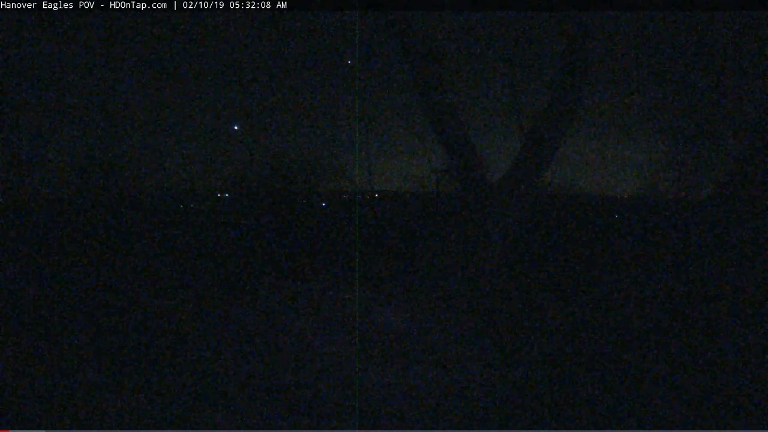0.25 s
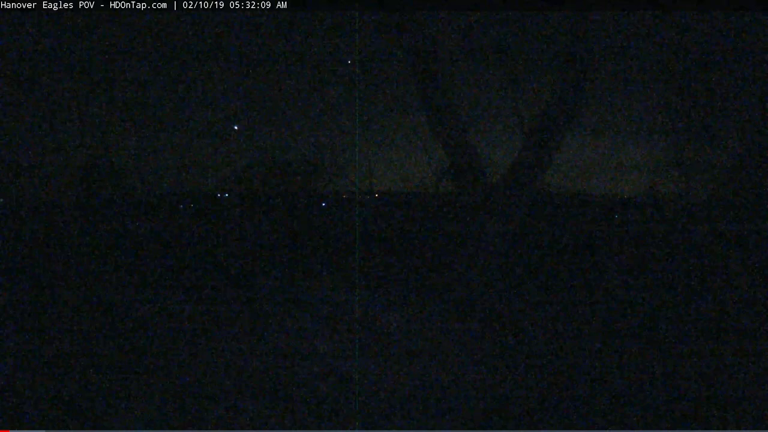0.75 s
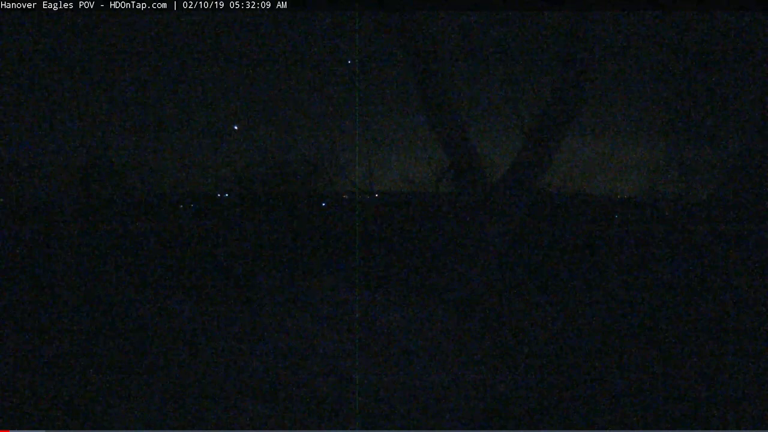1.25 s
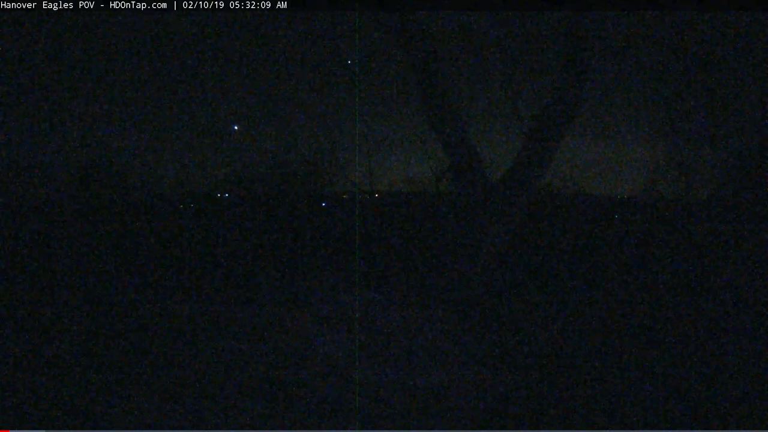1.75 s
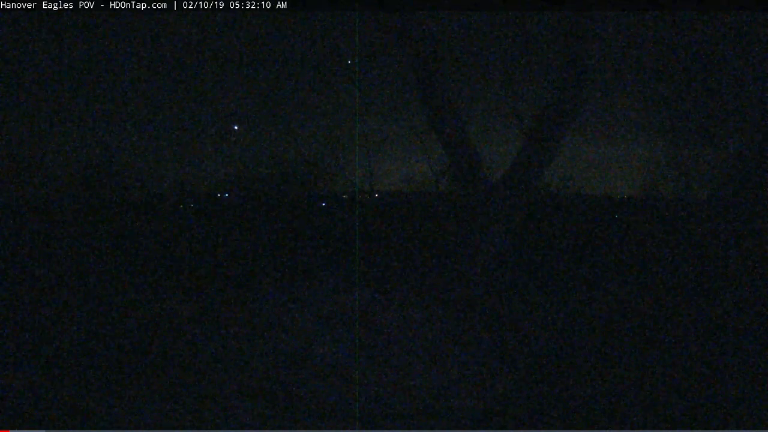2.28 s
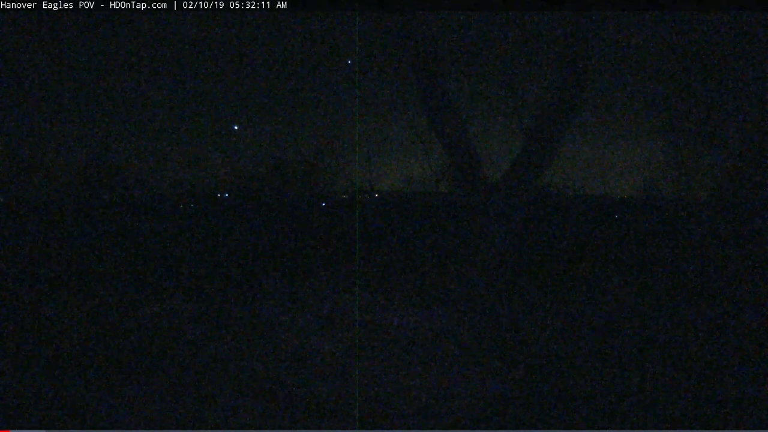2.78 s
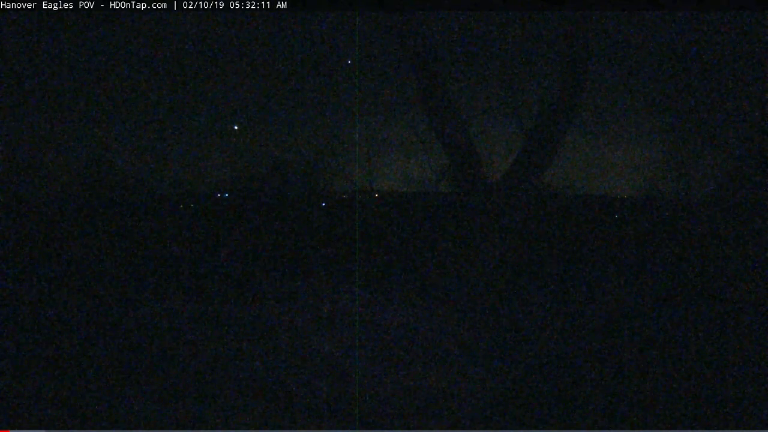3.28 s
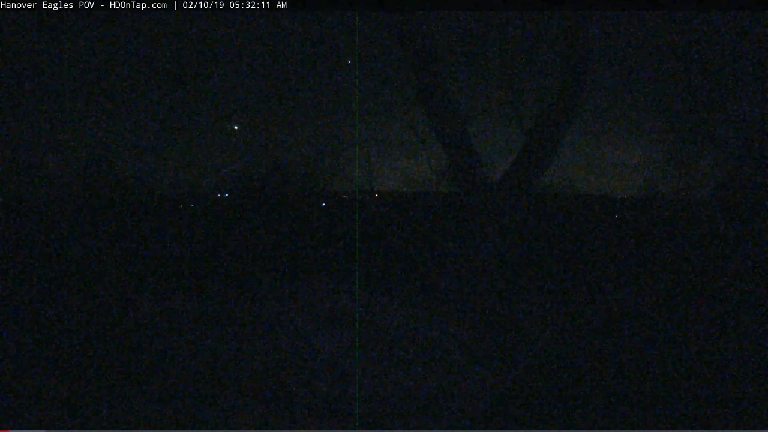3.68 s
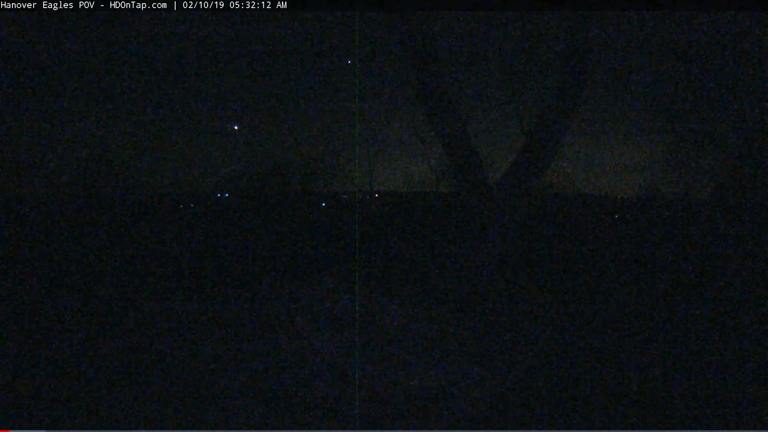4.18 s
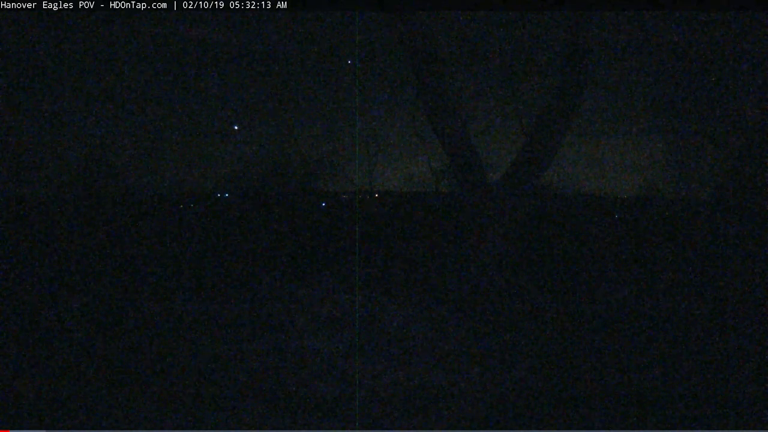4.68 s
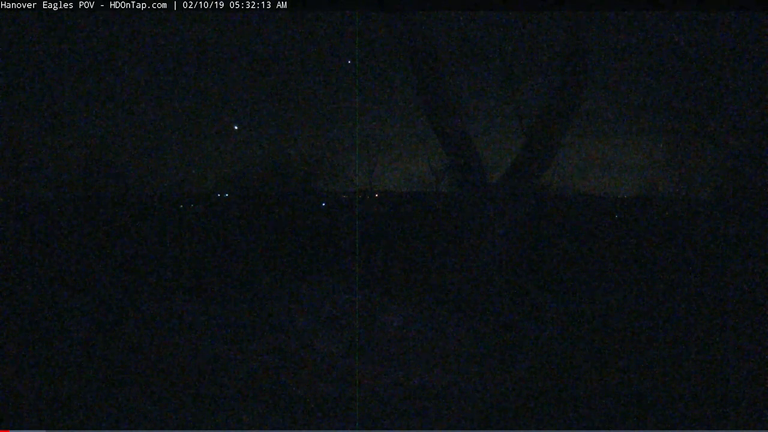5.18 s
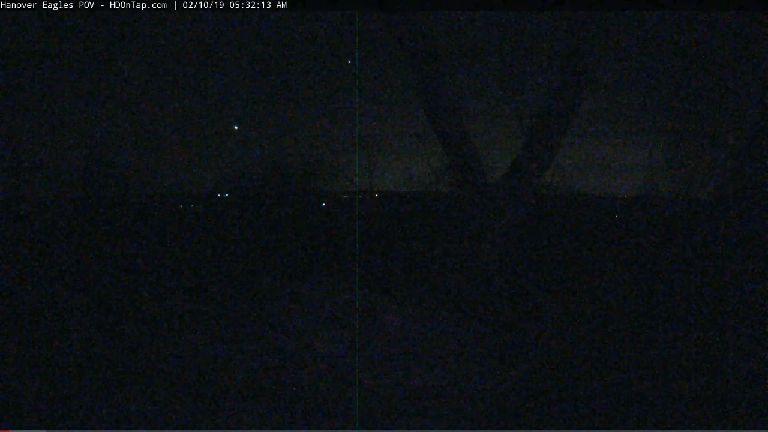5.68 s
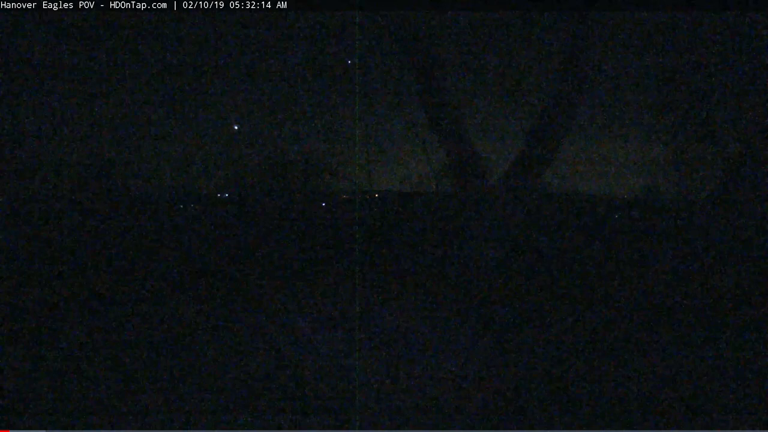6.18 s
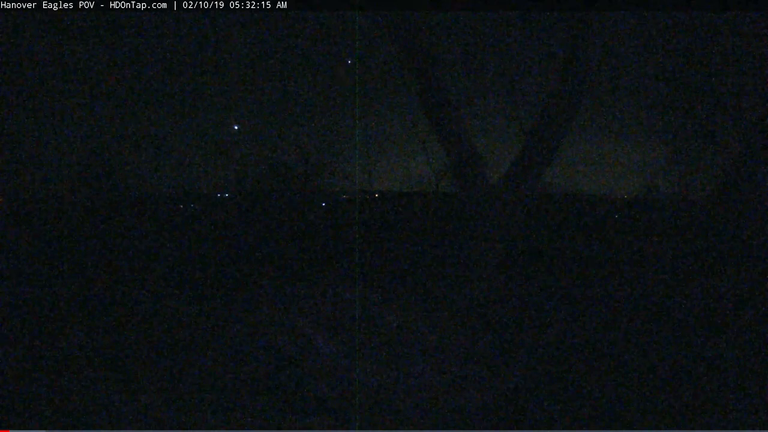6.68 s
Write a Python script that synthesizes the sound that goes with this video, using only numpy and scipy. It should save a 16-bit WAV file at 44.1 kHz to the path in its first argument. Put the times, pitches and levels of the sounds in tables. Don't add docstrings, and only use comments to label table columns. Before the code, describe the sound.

Fading squeals ring through night woods, then a raptor chatters in fast staccato, bursting into loud squealing notes over low hiss and rumble.

```python
import sys
import numpy as np
from scipy import signal
from scipy.fft import rfft, irfft, next_fast_len
from scipy.io import wavfile
from scipy.ndimage import uniform_filter1d

SR = 44100
rng = np.random.default_rng(int(sys.argv[2]) if len(sys.argv) > 2 else 0)


def transcribe(u):
    v = np.clip(np.atleast_2d(u).T, -1, 1)
    q = np.round(v * 32767).astype(np.int16)
    wavfile.write(sys.argv[1], SR, q)


def natural_amplitude(level_db):
    exponent = np.asarray(level_db, float) / 20
    return 10 ** exponent


N = 306054
LEAD = round(.6 * SR)

# [t/s, length/s, buzz f/Hz, beak f/Hz, peak level/dB]
CHATTER_NOTES = [(.318, 0.048, 895, 4020, -45), (.428, 0.03, 903, 5000, -46), (.456, .03, 904, 4380, -38),
                 (.547, 0.0278, 933, 4970, -37), (.578, 0.014, 898, 4750, -28),
                 (.682, 0.027, 894, 4300, -26.5), (.805, 0.028, 870.5, 4220, -27),
                 (.937, 0.021, 906, 3770, -32), (1.064, 0.019, 839, 3790, -40.5),
                 (2.870, 0.016, 664, 3650, -45.5), (2.992, 0.019, 673, 3570, -38.5),
                 (3.115, 0.019, 656, 3384, -31.5), (3.247, 0.022, 632.6, 3050, -15),
                 (3.378, 0.031, 643, 2963, -19.5), (4.663, 0.032, 866, 4130, -30.5),
                 (4.786, 0.044, 905, 4690, -36), (4.922, 0.032, 876, 4230, -27.5),
                 (5.061, 0.031, 855, 4100, -29), (5.198, 0.018, 846, 3930, -31.5)]
STEADY_DB, STEADY_SPAN_DB, STEADY_FLOOR = -18, 9, .3
GLIDE_SHARE, RASP_SHARE = 0.07, .42


def chatter(track):
    order = np.arange(3, 8)[:, None]
    flutter = signal.butter(6, 220, fs=SR, output="sos")
    treble = signal.butter(4, 6000, "high", fs=SR, output="sos")
    for s, length, buzz_hz, beak_hz, peak_db in CHATTER_NOTES:
        unrest = np.clip((STEADY_DB - peak_db) / STEADY_SPAN_DB, STEADY_FLOOR, 1)
        along, shape, quaver = note(length, attack_s=.005, release_s=.012)
        glide = GLIDE_SHARE * unrest * (np.sqrt(along) - .65)
        pitch_hz = buzz_hz * (1 + glide + .005 * quaver)
        phase = 2 * np.pi * np.cumsum(pitch_hz) / SR
        beak = 1 / (1 + ((order * buzz_hz - beak_hz) / 400) ** 2) ** 2.1
        wobble = rms_one(signal.sosfilt(flutter, rng.standard_normal((2, 5, 4000))))
        in_phase, quadrature = RASP_SHARE * unrest * wobble[..., -len(along):]
        partials = (1 + in_phase) * np.sin(order * phase) + quadrature * np.cos(order * phase)
        voice = rms_one((beak * partials).sum(axis=0)) / np.sqrt(2)
        octave = signal.sosfilt(treble, voice ** 2)
        add(track, s, natural_amplitude(peak_db) * shape * (voice + natural_amplitude(-30) * octave))


# [t/s, length/s, first f/Hz, held f/Hz, peak level/dB]
SQUEAL_NOTES = [(-.42, .044, 3500, 3140, -37.5), (-.33, .058, 2000, 2500, -25.5),
                (-.2, 0.045, 2600, 2375, -26), (-.16, 0.026, 2500, 2226, -29),
                (-.26, 0.0097, 2012, 1900, -18), (3.117, 0.094, 1890, 2575, -19),
                (3.519, 0.026, 2854, 2500, -18), (3.667, 0.021, 2290, 2372, -20.5),
                (3.685, 0.014, 2230, 1894, -33), (3.83, 0.0157, 2180, 1970, -19.5),
                (3.852, .016, 1560, 1245, -48.5), (4.03, 0.015, 1590, 1280, -47),
                (3.376, 0.011, 4350, 4080, -42.5), (3.396, 0.015, 2500, 2123, -27.5),
                (3.519, 0.011, 2320, 1998, -32), (0.938, .014, 2930, 2840, -51),
                (3.114, 0.013, 1660, 1968, -31.5), (5.321, 0.0286, 3540, 3320, -33.5)]
OVERTONE_LEVELS = (-25.5, -44.5)
SAG_SHARE, SAG_PER_S, SAG_GONE_HZ = 0.17, 1.3, 3500


def squeals(track):
    for s, length, first_hz, held_hz, peak_db in SQUEAL_NOTES:
        low_sag = SAG_SHARE * max(1 - held_hz / SAG_GONE_HZ, 0)
        last_hz = held_hz * (1 - low_sag - SAG_PER_S * length)
        along, shape, quaver = note(length, attack_s=0.14 * length, release_s=0.12 * length)
        slide_on = (first_hz - held_hz) * np.exp(-along / .09)
        slide_off = (last_hz - held_hz) * along ** 6
        pitch_hz = held_hz + slide_on + slide_off
        phase = 2 * np.pi * np.cumsum(pitch_hz * (1 + 0.0094 * quaver)) / SR
        effort = np.exp(-((pitch_hz / held_hz - 1) / .07) ** 2)
        overtones = sum(natural_amplitude(db) * np.sin((k + 2) * phase) for k, db in enumerate(OVERTONE_LEVELS))
        add(track, s, natural_amplitude(peak_db) * shape * (np.sin(phase) + effort * overtones))


# [t/s, length/s, rms level/dB, open-beak brightness/dB]
PUFF_NOTES = [(0.311, .049, -49.5, -8.5), (.421, 0.068, -50.5, 3), (0.542, 0.05, -49.5, 2.5),
              (0.674, 0.04, -47, -9), (0.93, 0.042, -49.5, -10), (1.064, .04, -55, -12),
              (3.245, 0.041, -47, 1), (3.37, .054, -48, -4.5), (3.488, 0.05, -49, -2.5),
              (4.648, .06, -53, -1), (4.765, 0.072, -53.5, 4), (4.91, 0.06, -52, 0),
              (5.057, 0.026, -47, -7), (5.172, 0.06, -56, -12)]
# [f/Hz, width/Hz, level/dB]
THROAT_MODES = [(2500, 1100, 17), (3654, 320, 20.5), (4500, 940, 17.5), (5300, 460, 11), (7690, 830, -5)]
GAPE_HZ = 5000


def puffs(track):
    for s, length, level_db, bright_db in PUFF_NOTES:
        along, shape, quaver = note(length, attack_s=.005, release_s=.025)
        air = rng.standard_normal(4000)
        out = 0
        for hz, width_hz, gain_db in THROAT_MODES:
            mode_db = gain_db + bright_db * (hz > GAPE_HZ)
            out = out + natural_amplitude(mode_db) * resonance(air, hz, width_hz)
        add(track, s, natural_amplitude(level_db) * shape * rms_one(out)[-len(shape):])


# [t/s, level/dB]
BEAK_CLACKS = [
    (.421, -52),
    (.545, -59),
    (3.247, -49),
    (3.395, -45),
    (3.520, -49),
    (4.700, -57),
    (.940, -63),
    (1.068, -65),
]


def clacks(track):
    bright = signal.butter(5, [2000, 8300], "band", fs=SR, output="sos")
    for s, level_db in BEAK_CLACKS:
        crack = rng.standard_normal(900) * np.exp(-np.arange(900) / SR / .004)
        add(track, s, natural_amplitude(level_db) * signal.sosfilt(bright, crack))


# [delay t/s, level/dB]
SLAPS = [(.006, -20), (.013, -5), (.049, -12), (0.058, -5.5), (0.071, -20.5), (0.088, -14), (.12, -22)]
# [f/Hz, t60/s]
TAIL_T60 = [(1000, 0.58), (2000, 1.66), (3200, 1.24), (4500, 0.91), (5600, 0.47), (8000, 0.2)]
# [f/Hz, level/dB]
RETURN_COLOUR = [(1200, -13), (2000, -3.5), (2600, 1), (3400, 3), (4500, 2.5), (5600, 0), (8000, 7)]


def wood(x, tail_db, build_s):
    t = np.arange(round(1.8 * SR)) / SR
    slaps = np.zeros(len(t))
    for delay_s, level_db in SLAPS:
        slaps[round(delay_s * SR)] += natural_amplitude(level_db)
    leaves = natural_amplitude(tail_db) * rng.standard_normal(len(t)) * (1 - np.exp(-(t / build_s) ** 2))
    answer = np.zeros(len(t))
    for hz, band in bands(slaps + leaves, 500, 2):
        answer += band * natural_amplitude(at_hz(RETURN_COLOUR, hz) - 60 * t / at_hz(TAIL_T60, hz))
    answer[0] += 1
    return signal.fftconvolve(x, answer)[LEAD:LEAD + N]


# [t/s, length/s, f/Hz, width/Hz, rms level/dB]
FAR_HOOTS = [
    (-.1, 0.65, 800, 94, -58.5),
    (0.391, 0.79, 674, 21, -64.5),
    (5.598, 0.45, 768, 10, -69.5),
    (1.249, 1.38, 2123, 6.2, -64),
    (2.547, 0.65, 2129, 8.8, -62.5),
    (4.297, 2.7, 2122, 4.4, -64),
    (4.399, 2.9, 1683, 105, -64),
]


def far_tones():
    track = np.zeros(N + LEAD)
    for s, length, hz, width_hz, level_db in FAR_HOOTS:
        t = np.arange(round(length * SR)) / SR
        tone = resonance(rng.standard_normal(3 * SR), hz, width_hz)[-len(t):]
        swell = np.clip(np.minimum(t / 0.017, (length - t) / 0.24), 0, 1)
        add(track, s, natural_amplitude(level_db) * tone * swell)
    return track[LEAD:]


# [t/s, peak level/dB]
AIR_HEAVES = [(.12, -52), (.53, -50), (.68, -60), (0.811, -51), (1.209, -52), (1.721, -49.5), (1.95, -58),
              (2.48, -58), (2.9, -54), (3.13, -54.5), (3.29, -53), (3.46, -56.5), (3.611, -55), (3.84, -61),
              (4.339, -57), (5.089, -56), (5.57, -57), (5.73, -57), (6.1, -58), (6.55, -59)]
# [t/s, peak level/dB]
AIR_GUSTS = [(.07, -52), (.44, -53), (.51, -52), (.69, -48), (.85, -49), (1.131, -53), (1.33, -55),
             (1.45, -53), (1.839, -51.5), (2.07, -53), (2.36, -55.5), (2.54, -48.5), (2.65, -53.5),
             (2.839, -53), (3.12, -47), (3.42, -57.5), (3.6, -52), (3.82, -50.5), (3.96, -53), (4.119, -52),
             (4.341, -53.5), (4.459, -56.5), (4.61, -51.5), (4.79, -55), (5.04, -46.5), (5.561, -55),
             (5.67, -51), (6.009, -53.5), (6.68, -52.5), (6.87, -60.5)]
CALM_DB, GUST_RISE_DB_PER_S, GUST_FALL_DB_PER_S = -68, 153.5, 149


def rumble():
    out = np.zeros(N)
    for low_hz, high_hz, rows in ((22.6, 50, AIR_HEAVES), (60.4, 145, AIR_GUSTS)):
        s, peak_db = np.transpose(rows)[..., None]
        late_s = np.arange(0, N + 100, 100) / SR - s
        drop_db = np.maximum(late_s * GUST_FALL_DB_PER_S, -late_s * GUST_RISE_DB_PER_S)
        gust_db = np.maximum((peak_db - drop_db).max(axis=0), CALM_DB)
        level_db = np.interp(np.arange(N) / 100, np.arange(len(gust_db)), gust_db)
        thud = signal.butter(3, [low_hz, high_hz], "band", fs=SR, output="sos")
        low = signal.sosfilt(thud, rng.standard_normal(N + SR))[SR:]
        out += natural_amplitude(level_db) * rms_one(low)
    return out


# [f/Hz, rms level/dB]
MAINS = [(60, -65), (120, -70.5), (180, -73.5)]


def hum():
    t = np.arange(N) / SR
    return sum(natural_amplitude(db) * np.sqrt(2) * np.sin(2 * np.pi * hz * t) for hz, db in MAINS)


# [f/Hz, density level/dB]
NIGHT_SPECTRUM = [(100, -22), (170, -2), (208, -7.5), (433, -14), (472, -15.5), (553, -12.5), (667, -15),
                  (1090, -19), (1650, -5), (1960, -7.5), (2140, -9.5), (2540, -23), (5300, -33),
                  (6890, -63), (11700, -120)]


def night():
    return flickering_noise(NIGHT_SPECTRUM, level_db=-55)


# [f/Hz, density level/dB]
HISS_SPECTRUM = [(4200, -32), (5300, -20.5), (5700, -1.5), (6400, -7.5), (7000, -6), (7600, -0.3),
                 (8300, 1), (8900, -3), (9600, -8), (10400, -3), (12500, -2), (14000, -1.5), (15000, -17),
                 (15400, -37)]


def hiss():
    return flickering_noise(HISS_SPECTRUM, level_db=-74)


# [f/Hz, spread level/dB]
FLICKER = [(30, 2.0), (120, 1.5), (300, .7), (2000, .5), (15000, .3)]


def flickering_noise(spectrum, level_db):
    size = next_fast_len(N)
    colour = natural_amplitude(at_hz(spectrum, np.fft.rfftfreq(size, 1 / SR)))
    noise = irfft(rfft(rng.standard_normal(size)) * colour, size)
    together = drift(4.2, count=size)
    out = np.zeros(size)
    for hz, band in bands(noise, 29.5, 1.0):
        wander = 0.28 * together + drift(4.4, count=size)
        out += band * natural_amplitude(at_hz(FLICKER, hz) * wander)
    return natural_amplitude(level_db) * rms_one(out[:N])


def note(length, attack_s, release_s):
    t = np.arange(round(length * SR)) / SR
    shape = np.clip(np.minimum(t / attack_s, (length - t) / release_s), 0, 1)
    knots = np.interp(np.arange(8000) / SR * 350, np.arange(70), rng.standard_normal(70))
    quaver = uniform_filter1d(knots, size=90)[:len(t)]
    return t / length, np.sin(np.pi / 2 * shape) ** 2, quaver


def resonance(x, hz, width_hz):
    r = np.exp(-np.pi * width_hz / SR)
    for _ in range(2):
        x = signal.lfilter([1 - r], [1, -2 * r * np.cos(2 * np.pi * hz / SR), r * r], x)
    return rms_one(x)


def rms_one(x):
    return x / np.sqrt(np.mean(x ** 2) + 1e-20)


def at_hz(points, hz):
    point_hz, value = np.transpose(points)
    return np.interp(np.log(hz + 1), np.log(point_hz), value)


def drift(rate_hz, count):
    knots = rng.standard_normal(int(count / SR * 60) + 8)
    r = np.exp(-2 * np.pi * rate_hz / 60)
    knots = signal.lfilter([np.sqrt(1 - r * r)], [1, -r], knots)
    return np.interp(np.arange(count) * 60 / SR, np.arange(len(knots)), knots)


def bands(x, low_hz, per_octave):
    spectrum = rfft(x)
    step = np.log2(np.fft.rfftfreq(len(x), 1 / SR) / low_hz + 1e-9) * per_octave
    for k in range(int(np.log2(16000 / low_hz) * per_octave) + 2):
        weight = np.clip(1 - abs(step - k), 0, 1)
        yield low_hz * 2 ** (k / per_octave), irfft(spectrum * weight, len(x))


def add(track, s, sound):
    at = LEAD + round(s * SR)
    track[at:at + len(sound)] += sound[:len(track) - at]


def scene():
    birds = np.zeros(N + LEAD)
    for source in (chatter, squeals, puffs, clacks):
        source(birds)
    housing = signal.iirpeak(6200, 5.8, fs=SR)
    birds = birds - 0.57 * signal.lfilter(*housing, birds)
    far = far_tones() + rumble() + hum() + night() + hiss()
    mono = wood(birds, tail_db=-35, build_s=.042) + far
    return np.array([mono, mono])


def roll_off(x):
    return signal.sosfilt(signal.butter(12, 15150, fs=SR, output="sos"), x)


def record(dry):
    side = signal.sosfilt(signal.butter(8, 280, "high", fs=SR, output="sos"), dry[0])
    for lag in (131, 223, 347):
        ends = np.zeros(lag + 1)
        ends[0], ends[-1] = 1, -.6
        side = signal.lfilter(ends[::-1], ends, side)
    bias = .0513
    mix = dry + natural_amplitude(-22) * side * [[1], [-1]] + bias
    return roll_off(mix)


dry = scene()
out = record(dry)
transcribe(out)
```